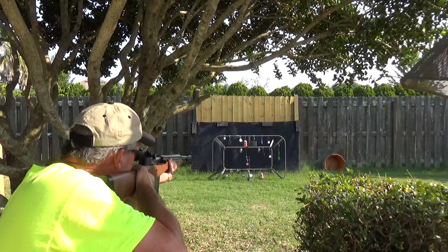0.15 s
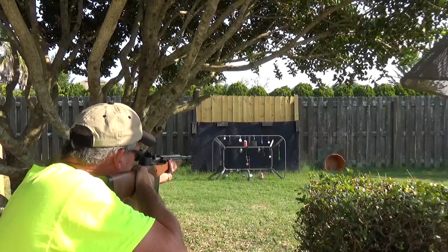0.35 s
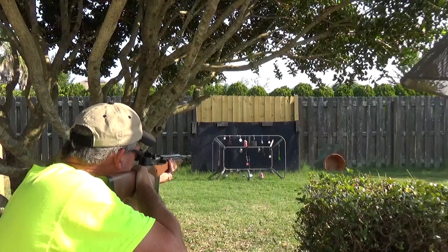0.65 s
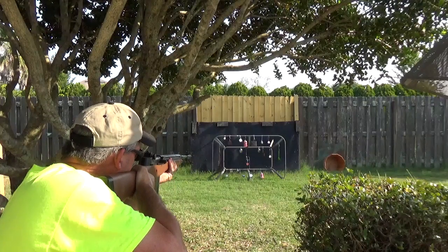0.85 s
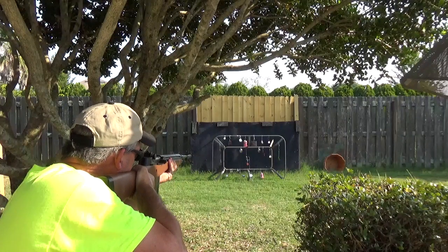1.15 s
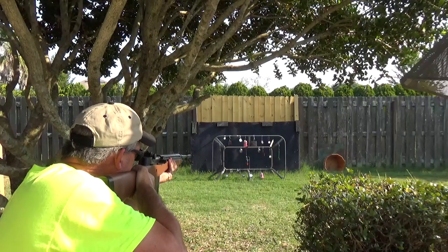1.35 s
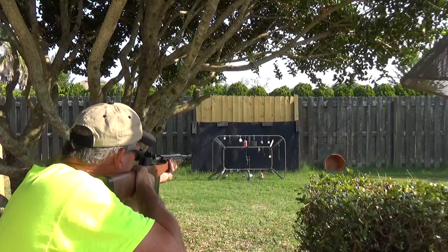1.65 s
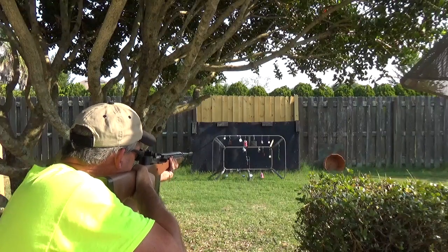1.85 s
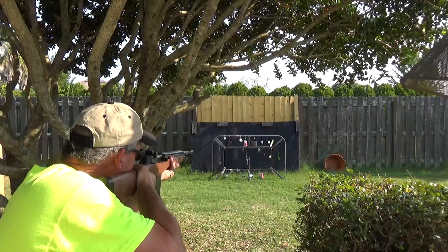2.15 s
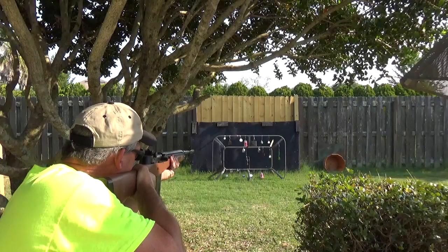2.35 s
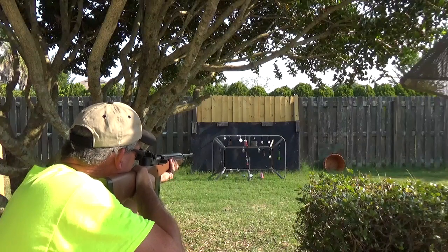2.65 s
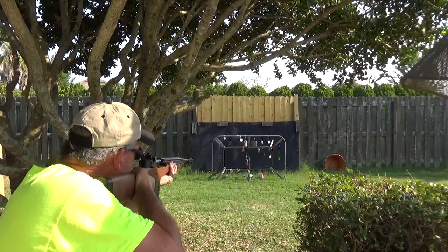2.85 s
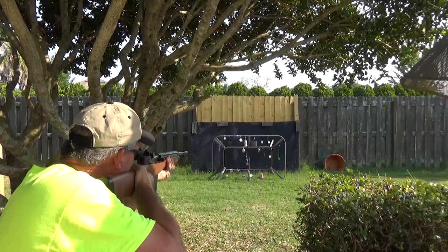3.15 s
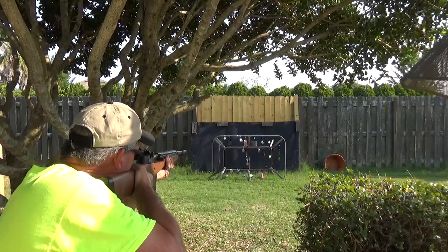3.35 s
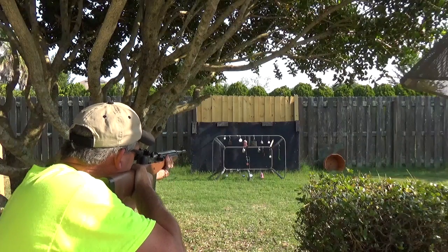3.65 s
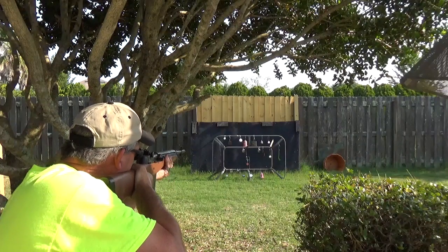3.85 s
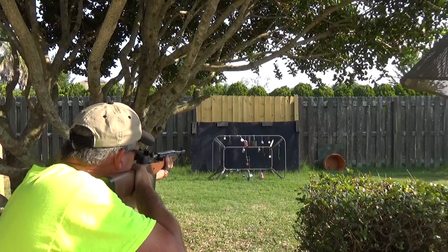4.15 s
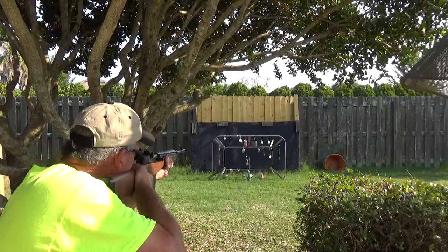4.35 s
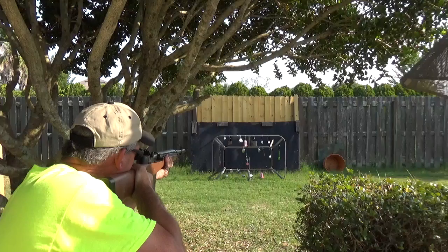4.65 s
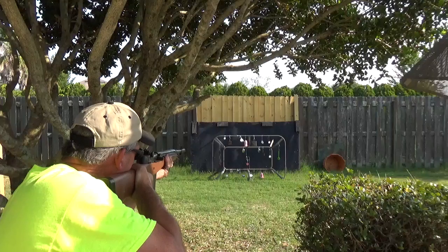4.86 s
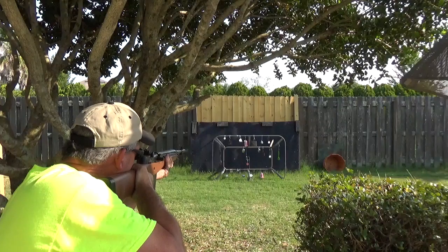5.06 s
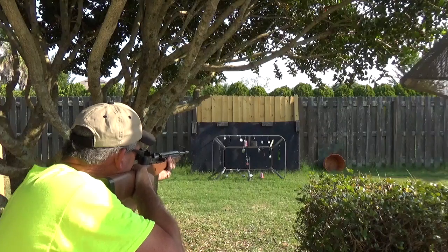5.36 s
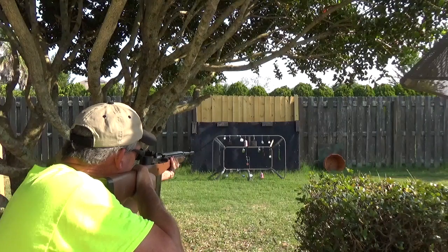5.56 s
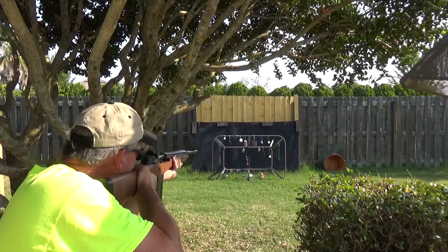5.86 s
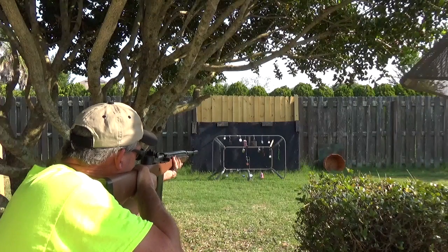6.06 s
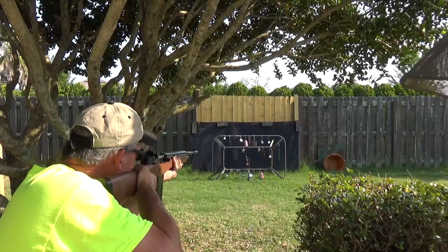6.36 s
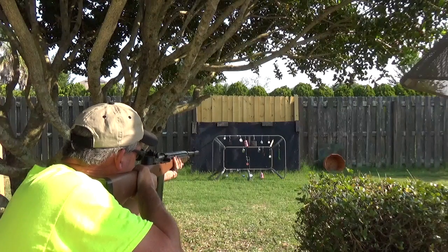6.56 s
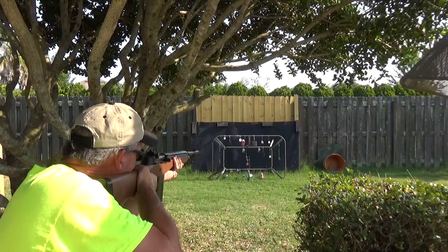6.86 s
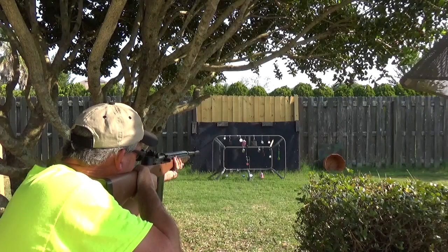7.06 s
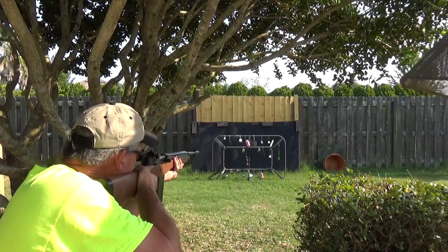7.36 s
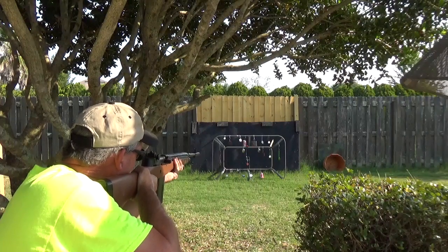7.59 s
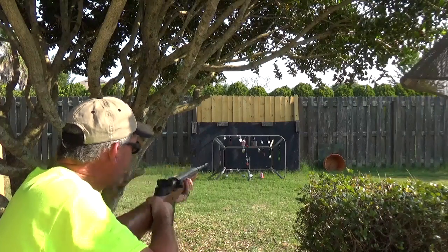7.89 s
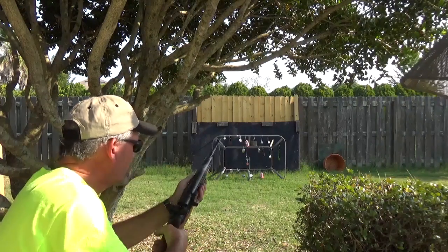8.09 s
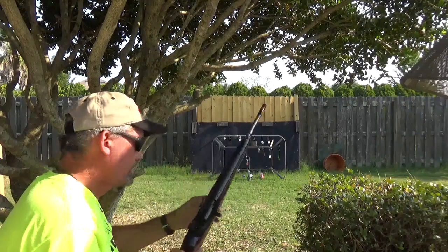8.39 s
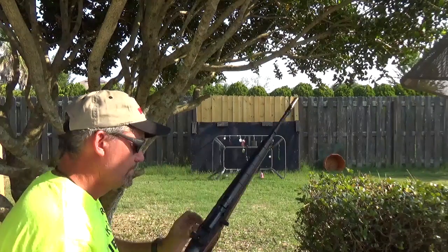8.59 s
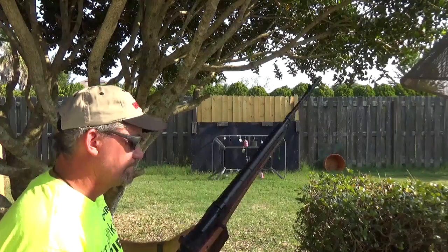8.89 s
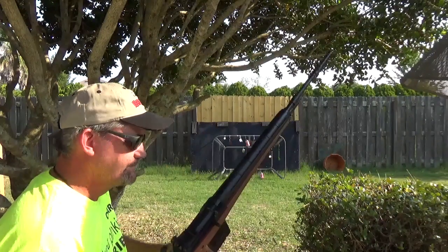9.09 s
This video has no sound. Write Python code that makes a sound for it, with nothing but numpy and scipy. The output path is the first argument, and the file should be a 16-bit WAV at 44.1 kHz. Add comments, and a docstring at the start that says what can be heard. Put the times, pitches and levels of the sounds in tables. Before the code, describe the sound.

Close microphone beside a shooter in a backyard. Whistled bird calls and soft distant traffic come first, then six hard airy bangs at uneven spacing, the last two only half a second apart. Most are followed almost at once by metal: loose jangle, tinny clank, short pings, a sweet ring. The action knocks dully after each bang, and light clicks come between. After the last shot, clothing rustles and the gun ticks in the hands.

```python
"""Traffic and leaves lie far off behind a wavering engine drone; a near bird whistles and a far one chirps.
Close to the microphone an air rifle ticks in the hands and cloth rustles; it fires six shots in a fenced yard.
Pellets strike hanging metal targets that ring and rattle; fences and far houses throw each bang back.
Air is shaped noise, birds are rough gliding sines, the gun is filtered noise bursts, targets are dying sines."""
import sys
import numpy as np
from scipy import signal
from scipy.io import wavfile
from scipy.ndimage import uniform_filter1d

SR = 44100
rng = np.random.default_rng(int(sys.argv[2]) if len(sys.argv) > 2 else 0)


def dump_mix(stems):
    """Bounce the given channels to the path in sys.argv[1] as a 16-bit WAV at rate SR."""
    frames = np.atleast_2d(stems).T  # one column per channel
    limited = np.clip(frames, -1, 1)  # hard clip at full scale
    pcm = np.round(limited * 32767).astype(np.int16)
    wavfile.write(sys.argv[1], SR, pcm)


N = 407034  # samples


def amp(db):
    """Decibels to a linear factor."""
    return 10 ** (np.asarray(db) / 20)


def evened(x):
    """Scale to rms 1."""
    return x / np.sqrt(np.mean(x ** 2) + 1e-20)


def read(points, hz):
    """Read a table of (Hz, value) along a log frequency axis."""
    f, value = np.transpose(points)
    return np.interp(np.log(hz + 1), np.log(f + 1), value)


def add(mix, s, sound):
    """Lay a sound into the mix at s seconds, trimmed to fit."""
    at = round(s * SR)
    sound = sound[max(-at, 0):]
    part = mix[max(at, 0):][:len(sound)]
    part += sound[:len(part)]


def coloured(x, points):
    """Causal minimum-phase filter with the given spectrum, scaled to energy 1."""
    hz = abs(np.fft.fftfreq(4096, 1 / SR))
    log_gain = np.log(amp(np.maximum(read(points, hz), -80)))
    phase = signal.hilbert(log_gain).imag
    taps = np.fft.ifft(np.exp(log_gain - 1j * phase)).real[:2048]
    return signal.oaconvolve(x, taps / np.linalg.norm(taps))[:len(x)]


def band(x, lo_hz, hi_hz, order=2):
    """Butterworth bandpass."""
    edges = [lo_hz, min(hi_hz, 20000)]
    return signal.sosfilt(signal.butter(order, edges, "bandpass", fs=SR, output="sos"), x)


def puff(t60, rise, count=4000):
    """A burst of noise with peak about 1: rises, then falls 60 dB in t60 seconds."""
    t = np.arange(count) / SR
    return rng.standard_normal(count) / 2 * amp(-60 * t / t60) * (1 - np.exp(-t / rise))


def wander(count, size):
    """Smoothed noise of rms 1; a larger size in samples drifts more slowly."""
    return evened(uniform_filter1d(uniform_filter1d(rng.standard_normal(count), size), size))


def gate(t, length, edge):
    """Rises, holds and falls: 0 to 1 and back, with soft edges."""
    return np.sin(np.pi / 2 * np.clip(np.minimum(t, length - t) / edge, 0, 1)) ** 2


def warble(hz, rough_db):
    """A near sine that follows hz, with a rough throat: pitch and level flutter."""
    turns = np.cumsum(hz * (1 + 0.011 * wander(len(hz), size=90))) / SR
    return amp(rough_db * wander(len(hz), size=70)) * np.sin(2 * np.pi * turns)


# How the yard dies away. Each row: frequency in Hz, t60 in s before each use stretches it.
YARD_T60 = [(100, .2), (300, 0.18), (1000, 0.66), (3000, 0.79), (6000, 0.54), (11000, 0.37)]


def tail(hold, rise, stretch, far_db):
    """Two unlike yard responses of energy about 1: build up, hold while echoes keep arriving, die by band.
    Echoes come in clumps, and far gardens add a slower, fainter end."""
    hz, t, z = signal.stft(rng.standard_normal((2, SR)), SR, nperseg=128)
    fall_db = -60 * np.maximum(t - hold, 0) / (stretch * read(YARD_T60, hz)[:, None])
    fall = amp(fall_db) + amp(far_db + fall_db / 3.1)
    h = signal.istft(z * fall, SR, nperseg=128)[1][:, :SR]
    clumps = amp(2.2 * wander(SR, size=45))
    h = h * (1 - np.exp(-np.arange(SR) / SR / rise)) * clumps
    return h / np.linalg.norm(h[0])


def spread(x, h, side_db):
    """Sound through the yard to two channels: a shared part and a weaker unlike part."""
    mid, side = signal.fftconvolve(x[None], h, axes=1)[:, :len(x)]
    return np.array([mid + amp(side_db) * side, mid - amp(side_db) * side])


# Far traffic and leaves. Each row: frequency in Hz, relative density in dB per Hz.
AIR_SPECTRUM = [(15, -47), (30, -18), (75, -1), (130, -0.5), (250, -6), (370, -15), (480, -8), (650, -11.5),
                (1230, -14), (2700, -20.5), (4200, -27), (5800, -20.5), (7500, -28), (10600, -31),
                (12000, -32.5)]
# Their slow drift; only changes about the mean count. Each row: time in s, traffic in dB, leaves in dB.
AIR_DRIFT = [(0, -46.5, -57), (1.3, -48.5, -58), (2.2, -51, -61), (3.3, -50, -59.5), (4.2, -50, -59.5),
             (5.5, -52, -62.5), (6.5, -49, -59), (7.6, -53.5, -63), (8.4, -49.5, -58.5), (9.23, -48, -58)]
# Unlike part between the two channels. Each row: frequency in Hz, level in dB against the shared part.
AIR_SIDE = [(60, -14.5), (220, -16), (830, -17), (3080, -16), (11500, -9.5)]
# A far engine. Each row: time in s, mean level in dB before its waver.
ENGINE_LEVEL = [(0.0, -52), (0.33, -63), (0.38, -47), (0.59, -59), (1.21, -50), (1.95, -63), (2.36, -54),
                (2.44, -63.5), (3.24, -47), (3.98, -57), (4.11, -52.5), (4.34, -72), (4.39, -58),
                (5.48, -53.5), (5.81, -60.5), (8.02, -56), (8.17, -65), (9.23, -50)]
ENGINE_HZ = 75  # centre of a wavering pitch


def air():
    """Random short-time spectra with faint patches; traffic below, leaves above; a wavering drone."""
    frames, hz = N // 256 + 5, np.fft.rfftfreq(1024, 1 / SR)
    a, b, c, d, patches = rng.standard_normal((frames, 513, 5)).T
    patches = evened(uniform_filter1d(uniform_filter1d(patches, 10, 0), 14, 1))
    # narrow random patches make the air faintly tonal, mostly at low frequencies
    narrow_patches = rng.standard_normal((513, frames))
    narrow_patches = evened(uniform_filter1d(uniform_filter1d(narrow_patches, 2, 0), 30, 1))
    narrow_patches = narrow_patches * np.interp(hz, [900, 2500], [1, .3])[:, None]

    s, low_db, high_db = np.transpose(AIR_DRIFT)
    t = np.arange(frames) * 256 / SR
    high = np.clip(np.log2((hz + 1) / 1500) / 0.99, 0, 1)[:, None]  # 0 is traffic, 1 is leaves
    low_drift_db = np.interp(t, s, low_db - low_db.mean())
    high_drift_db = np.interp(t, s, high_db - high_db.mean())
    drift_db = (1 - high) * low_drift_db + high * high_drift_db

    mid, side = a + 1j * b, (c + 1j * d) * amp(read(AIR_SIDE, hz))[:, None]
    level_db = read(AIR_SPECTRUM, hz)[:, None] + drift_db + 1.6 * patches + 2.2 * narrow_patches
    z = np.array([mid + side, mid - side]) * amp(level_db)
    wash = amp(-49) * evened(signal.istft(z, nperseg=1024, noverlap=768)[1][:, :N])

    s, db = np.transpose(ENGINE_LEVEL)
    turns = np.cumsum(ENGINE_HZ * (1 + 0.0244 * wander(N, size=4000))) / SR
    drone_db = np.interp(np.arange(N) / SR, s, db) + 3.9 * wander(N, size=2500)
    drone = amp(drone_db) * np.sin(2 * np.pi * turns)
    return wash + drone * amp([[.8], [-.8]])  # dB: the drone leans to the first channel


# Near bird, runs of whistles. Each row: first call in s, end in s, s between calls, relative level in dB,
# its change in dB per s, start pitch in Hz, top pitch in Hz, top change in Hz per s, start in dB against the top.
WHISTLES = [(-.135, 1.45, 0.25, -44.5, -2.5, 2112, 2900, -50, -3),
            (2.092, 2.45, .257, -50, -1.2, 2080, 2782, -30, -5),
            (2.868, 4.25, .255, -48, -0.5, 1962, 2745, 30, -5)]
# Far bird, falling chirps. Each row: start in s, start pitch in Hz, length in s, relative level in dB.
CHIRPS = [(.212, 4300, .062, -59), (.99, 4000, 0.027, -59), (1.123, 4000, .048, -59),
          (1.339, 4400, 0.055, -52), (3.0, 4400, .05, -60), (3.257, 4300, .04, -59),
          (3.585, 4400, .063, -56), (3.812, 4404, .051, -56.5), (5.86, 4500, .051, -62),
          (6.04, 5000, .06, -61), (7.87, 4200, .04, -60), (8.092, 4060, .036, -56.5),
          (8.307, 4270, .039, -57)]
CHIRP_END_HZ = 3850
START_S, GLIDE_S, TOP_S = .028, .032, .03  # a call: level start, rising glide, held top
# The low note before each call: its lead, length, pitch, fall in pitch, and level against the call's start.
LEAD_S, LEAD_LENGTH_S, LEAD_HZ, LEAD_SAG_HZ, LEAD_DB = .095, .045, 1810, 110, -3.5


def birds():
    """Near-sine glides with a rough throat, smeared by the gardens around."""
    early = SR // 4  # samples: calls just before the start still echo
    near, far = np.zeros((2, N + early))
    t = np.arange(0, START_S + GLIDE_S + TOP_S, 1 / SR)
    lead = np.arange(0, LEAD_LENGTH_S, 1 / SR)
    risen = np.clip((t - START_S) / GLIDE_S, 0, 1)
    for first, end, every, db, fade_db, start_hz, top_hz, drift_hz, start_db in WHISTLES:
        for later in np.arange(0, end - first, every):
            s = early / SR + first + later + rng.normal(0, .002)
            level_db = db + fade_db * later + rng.normal(0, 1.2)
            hz = start_hz + (top_hz + drift_hz * later - start_hz) * risen
            shape = amp(level_db + start_db * (1 - risen)) * gate(t, t[-1], 0.013)
            add(near, s, shape * warble(hz, 3.5))
            low = warble(LEAD_HZ - LEAD_SAG_HZ * lead / lead[-1], 3.0)
            low_shape = amp(level_db + start_db + LEAD_DB) * gate(lead, lead[-1], .015)
            add(near, s - LEAD_S, low_shape * low)
    for start, start_hz, length, level_db in CHIRPS:
        u = np.linspace(0, 1, round(length * SR))
        glide = CHIRP_END_HZ + (start_hz - CHIRP_END_HZ) * (1 - u) ** 2
        add(far, early / SR + start, amp(level_db) * np.sin(np.pi * u) * warble(glide, 4.1))
    echo = spread(amp(-4) * near + amp(-7) * far, tail(0.054, 0.007, 1.2, -43.5), -19.5)
    return (near + far + echo)[:, early:]


# The gun and its handling, close by. Each row: start in s, relative peak in dB, body in Hz,
# gain in dB of the bright edge against the body.
TICKS = [(.783, -31, 1730, -11), (2.103, -32, 1390, -11), (3.042, -35, 1720, 1.5), (4.625, -31.5, 3840, -3),
         (4.633, -30.5, 3510, 3), (4.746, -40, 2600, -6), (4.783, -23, 1240, -5.5), (5.503, -40, 1080, -2),
         (5.515, -34, 3510, 0), (5.802, -38, 3580, -11), (5.949, -28, 1160, -6.5), (6.995, -22.5, 3410, -3),
         (7.034, -26, 2670, -3), (7.052, -24.5, 2920, -1.5), (7.877, -40, 2070, -3), (8.218, -41, 970, -3),
         (8.757, -30, 1330, -7.5), (8.82, -27, 1320, -7), (9.13, -27.5, 886, -8), (9.151, -30.5, 923, -12)]
# A shirt rustles. Each row: start in s, length in s, relative level in dB.
RUSTLES = [(7.84, 0.24, -56.5), (8.11, 0.13, -62), (8.202, 0.19, -52), (8.36, .45, -67), (9.0, .3, -57.5)]
TICK_T60_S, CLOTH_EDGE_S = 0.057, 0.043


def handling():
    """Short ticks with a body and a bright edge, over the rustle of cloth made of uneven noise."""
    out = np.zeros(N)
    for s, db, hz, bright_db in TICKS:
        snap = puff(.008, 1e-4) + amp(-10) * puff(TICK_T60_S, .001)  # a sharp edge, then a short ring
        tick = band(snap, hz / 1.67, hz * 1.38) + amp(bright_db) * band(snap, 3000, 7540)
        add(out, s, amp(db) * tick / abs(tick).max())
    t = np.arange(N) / SR
    level = sum(amp(db) * gate(t - s, length, CLOTH_EDGE_S) for s, length, db in RUSTLES)
    uneven = evened(uniform_filter1d(rng.standard_normal(N), 200))
    rub = rng.standard_normal(N) * amp(2.5 * uneven)
    return out + evened(band(rub, 4800, 11000)) * level


# The shots. Each row: muzzle bang in s, relative bang level in dB, s the hammer falls before it,
# s the trigger slips before it, relative trigger level in dB, s the rattle starts after it.
SHOTS = [(1.3938, 0.5, .014, .02, -31, .23), (2.3134, 2, .007, .017, -19, .23),
         (4.2266, 0, 0.0079, .0142, -16.5, .264), (4.9961, -1, .0095, .018, -21, .23),
         (6.6451, -.5, 0.0076, 0.015, -18, .222), (7.1322, -.5, .006, .012, -15.5, .235)]
# Colour of the bang close by. Each row: frequency in Hz, relative density in dB per Hz.
BANG = [(35, -54), (60, -28), (268, -9), (674, -16.5), (736, -11), (1220, -16), (2210, -6), (4470, -9.5),
        (6350, -1), (7570, -12), (8640, 0), (10800, -0.5), (11500, -22.5), (15000, -49), (22000, -120)]
# Near reflections. Each row: s after the bang, burst level in dB over the bang before filtering,
# low edge in Hz, t60 in s.
ECHOES = [(.0037, 10.5, 4000, .0073), (.0072, 16, 3950, .008), (.0122, -7.5, 4000, .03),
          (.0302, 13, 1500, .011), (.041, -4.5, 2500, .006), (.0443, -2.5, 2500, .0064)]
# Colour of the yard's answer. Each row: frequency in Hz, relative density in dB per Hz.
ANSWER = [(35, -70), (60, -25), (229, -10), (380, -20), (495, -18.5), (617, -6), (822, -13.5), (937, -7),
          (4090, -11), (6100, 2), (7600, -3), (9300, -.5), (10800, -0.5), (11500, -15), (15000, -68),
          (22000, -120)]
# Dull knocks as the action settles. Each row: s into the rattle, mean gain in dB against the bang.
RATTLE = [(0, -26.5), (.0092, -24.5), (.038, -29), (.068, -35)]
HAMMER_DB = -2  # the same for every shot


def rifle():
    """Trigger slip, hammer, then the gas bang with its reflections and the yard's long answer; a rattle follows."""
    near, front, thump = np.zeros((3, N))
    t = np.arange(2000) / SR
    knock = sum(amp(db - 60 * t / 0.036) * np.sin(2 * np.pi * hz * t)
                for hz, db in ((640, -3), (1130, 2.5), (1290, 1.0)))
    knock = (1 - np.exp(-t / .0008)) * knock
    push = np.arange(800) / SR / 0.0009  # the low shove of gas, in units of its length
    shove = (1 - push) * np.exp(-push) * np.minimum(4 * push, 1)
    for s, db, hammer_s, trigger_s, trigger_db, rattle_s in SHOTS:
        add(front, s, amp([db]))  # a single impulse for the yard to answer
        add(thump, s, amp(db - 5) * shove)
        add(near, s - hammer_s, amp(HAMMER_DB) * puff(0.049, 0.0017))
        add(near, s - trigger_s, amp(trigger_db) * puff(0.1, 0.00083))
        swell = puff(0.028, 1e-5)[::-1]  # a faint noise swells up just before the trigger slip
        add(near, s - trigger_s - 4000 / SR, amp(trigger_db - 12) * swell)
        add(near, s, amp(db + 1) * puff(0.014, .0001))
        for later, echo_db, lo_hz, t60 in ECHOES:
            add(near, s + later, amp(db + echo_db) * band(puff(t60, .0001), lo_hz, 18000))
        for later, knock_db in RATTLE:
            level = amp(db + knock_db + 1.1 * rng.standard_normal())
            rough = 2.2 * band(puff(.03, .0005, count=2000), 500, 2300)
            add(near, s + rattle_s + later, level * (knock + rough))
    answer = spread(coloured(front, ANSWER), tail(0.059, 0.002, 0.73, -32.5), -15.5)
    return coloured(near, BANG) + band(thump, 200, 2200) + amp(23) * answer


# What each hanging target rings with. Each row: mode in Hz, relative level in dB, t60 in s.
SPOON = [(2240, -12.5, .18), (2620, -15, .2), (3240, -13, .22), (4610, -14.5, 0.19), (5160, -5.5, 0.25),
         (5220, -9, 0.2), (5310, -14, .4), (5360, -8.5, 0.39), (6020, -4, .2), (6710, -13, 0.2),
         (7100, -16.5, .25), (8111, -20.5, .18), (9230, -9, 0.17), (10170, -13, .18)]
PLATE = [(3515, -23.5, 1.2), (4899, -8, .3), (4920, -5, .42), (6901, -6, .3), (8450, -12, .1),
         (9437, -12, .33)]
BELL = [(3418, -3.5, .42), (3420.5, -9.5, .54), (4775, -19.5, .8), (7316, -1, .37), (8748, -13, .25),
        (10380, -31, .9)]
CAN = [(862, -0.5, 0.57), (3430, -14, 0.99), (5560, -1, 0.44), (10330, -1.5, 0.51)]
# How each hangs; the spoon is loose on its hook and jangles.
# Each row: modes, waver in dB before long rings are steadied, smoothing of the waver in samples.
TARGETS = {"spoon": (SPOON, 5, 90), "plate": (PLATE, 1.8, 300), "bell": (BELL, .5, 300),
           "can": (CAN, 3, 200)}


def struck(target, s, db, crack_db, swell, near_hz, favour_db):
    """A crack, then dying sines that swell in; each mode wavers as the target swings and twists."""
    modes, waver_db, size = TARGETS[target]
    t = np.arange(0, min(1, max(np.transpose(modes)[2])), 1 / SR)  # the longest t60, 1 s at most
    out = np.zeros(len(t))
    add(out, 0, amp(crack_db) * coloured(puff(0.018, 0.00013), BANG))
    for hz, mode_db, t60 in modes:
        lift_db = favour_db * np.exp(-(np.log(hz / near_hz) / .1) ** 2)
        sway_db = waver_db * min(1, 0.33 / t60) * wander(len(t), size)  # long rings keep steadier
        ring = amp(db + mode_db + lift_db - 60 * t / t60 + sway_db) * np.sin(2 * np.pi * hz * t)
        out += ring * (1 - np.exp(-t / max(swell, 1e-4)))
    return s, out


# The pitch centre slides towards SETTLE_HZ.
CLATTER_RISE_S, SETTLE_HZ, SETTLE_S = .022, 3000, .12


def clatter(s, db, hold, t60, start_hz):
    """Dense uneven knocks: a wide resonance that moves, plus the short ring of many small plates of tin."""
    t = np.arange(SR // 2) / SR
    hz = SETTLE_HZ + (start_hz - SETTLE_HZ) * np.exp(-t / SETTLE_S)
    knocks = rng.standard_normal(len(t)) * amp(2.3 * wander(len(t), size=100))
    # shift the moving centre to 0 Hz, smooth there, shift back
    turn, r = np.exp(2j * np.pi * np.cumsum(hz) / SR), np.exp(-np.pi * 2500 / SR)
    wide = (turn * signal.lfilter([1 - r], [1, -r], knocks / turn)).real
    tin = sum(band(wide, f, f + 160, order=1) * amp(3.6 * wander(len(t), size=400))
              for f in np.geomspace(850, 7000, num=14))
    level = amp(db - 60 * np.maximum(t - hold, 0) / t60) * gate(t, t[-1], CLATTER_RISE_S)
    return s, level * evened(evened(band(wide, 800, 12000, order=3)) + amp(-3.5) * evened(tin))


# Pellet hits and rebounds. Each row: target, start in s, relative ring level in dB, relative crack level in dB,
# swell in s, Hz near which the place struck favours modes, lift there in dB.
BLOWS = [("spoon", 1.454, -20.5, -5.5, .002, 9500, 15.5), ("spoon", 1.47, -12.5, -19, 0.011, 5340, 6.5),
         ("spoon", 1.487, -21, -18, .007, 9600, 26), ("spoon", 1.521, -22, -22, .002, 8100, 29.5),
         ("spoon", 1.555, -18.5, -22, .004, 5140, 4.5), ("spoon", 1.645, -30, -30, .002, 10000, 6.6),
         ("spoon", 1.686, -25.5, -31, .01, 8070, 14), ("spoon", 1.7, -27, -30, .003, 10240, 9),
         ("spoon", 1.746, -28.5, -27, .003, 6100, 7.3), ("spoon", 1.81, -32.5, -33.5, .003, 7340, 7),
         ("spoon", 1.835, -36, -45, .01, 2460, 11), ("can", 2.373, -25.5, 2.7, .003, 2885, .8),
         ("spoon", 2.5, -54, -52, .004, 5200, 9), ("spoon", 2.917, -43.5, -30, .001, 6900, 13.4),
         ("spoon", 2.96, -45, -40, .003, 6000, 1.5), ("spoon", 3.27, -52, -50, .01, 6000, 8.5),
         ("plate", 4.2855, -13, -12, .003, 6900, 9.5), ("plate", 5.0555, -12, -13, .001, 5080, 1.1),
         ("plate", 5.066, -28.5, -35.5, 0.0028, 9400, 33), ("bell", 6.7079, -4.5, -17.5, .002, 3400, .7)]
# Bouts of struck targets clattering on their hooks. Each row: start in s, relative level in dB, hold in s,
# t60 in s, pitch centre at the start in Hz.
CLATTER = [(1.455, -30, 0.089, 0.46, 6000), (1.64, -33.5, .15, .45, 5200), (2.05, -49, 0.066, 0.32, 4200),
           (2.366, -13.5, .035, .2, 1998), (2.41, -15, .025, 0.47, 1900), (2.911, -51.5, 0.09, .6, 3000)]


def targets():
    """Rings and clatter reach the microphone directly, with a fainter answer from the yard."""
    rings, knocks = np.zeros((2, N))
    for row in BLOWS:
        add(rings, *struck(*row))
    for row in CLATTER:
        add(knocks, *clatter(*row))
    sent = amp(-12.5) * rings + amp(-14.0) * knocks
    return rings + knocks + spread(sent, tail(.01, .004, 0.44, -33.5), -12)


def scene():
    """All sources together, the first channel slightly louder (gains in dB)."""
    return (air() + birds() + handling() + rifle() + targets()) * amp([[.4], [-.4]])


EDGE_HZ = 11080  # top of the band


def record(dry):
    """A fast limiter holds the bangs under full scale, the band is cut, and the last peaks clip."""
    peak_db = 20 * np.log10(abs(dry).max(0) + 1e-9)
    fall = np.arange(N) * 2700.0 / SR  # recovers this many dB a second
    over_db = np.maximum(np.maximum.accumulate(peak_db + fall) - fall + 1.0, 0)  # over -1 dB
    held = np.clip(dry / amp(uniform_filter1d(over_db, 15)), -1.3, 1.3)
    lowpass = signal.firwin(511, EDGE_HZ, window=("kaiser", 9), fs=SR)
    cut = signal.oaconvolve(held, lowpass[None], "same")
    return np.clip(cut, -1, 1)


dry = scene()
out = record(dry)
dump_mix(out)
```